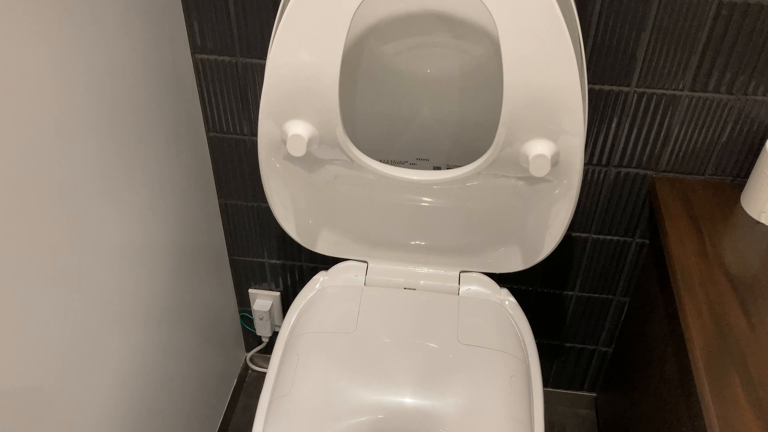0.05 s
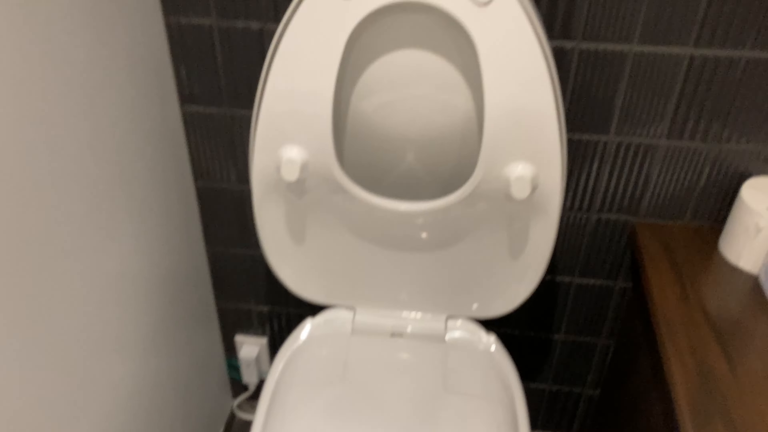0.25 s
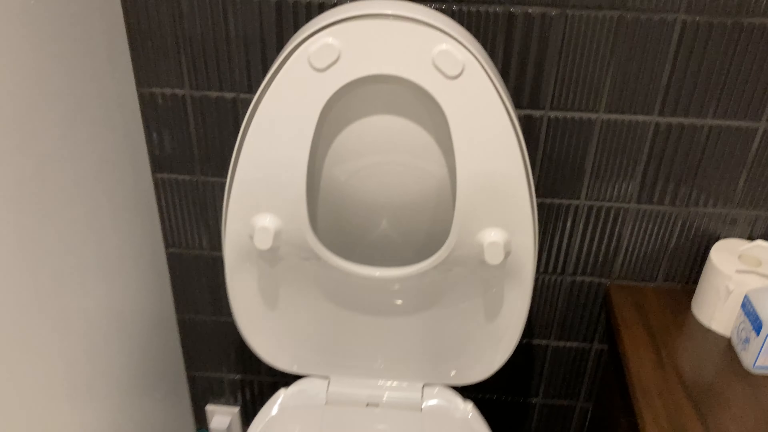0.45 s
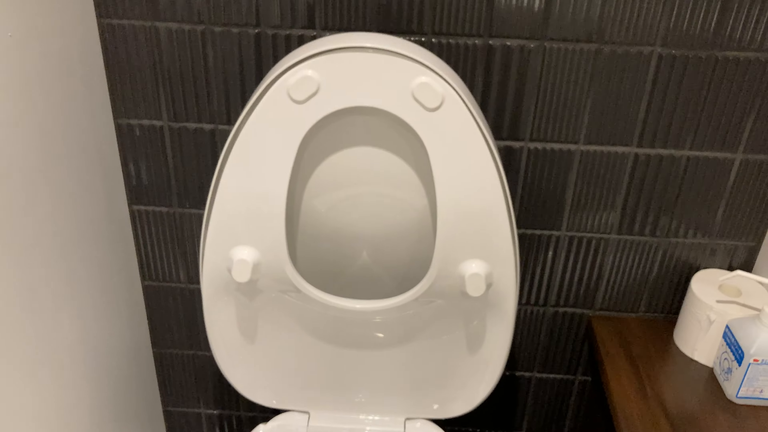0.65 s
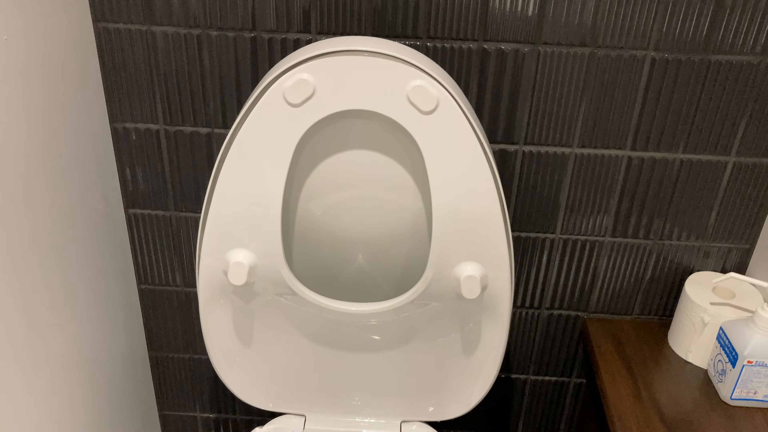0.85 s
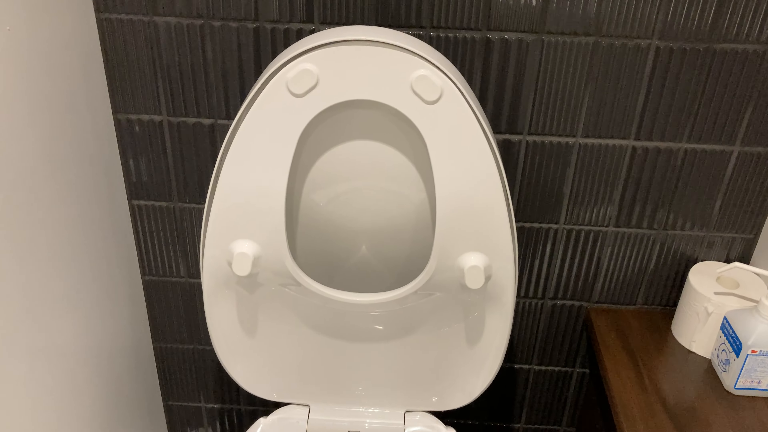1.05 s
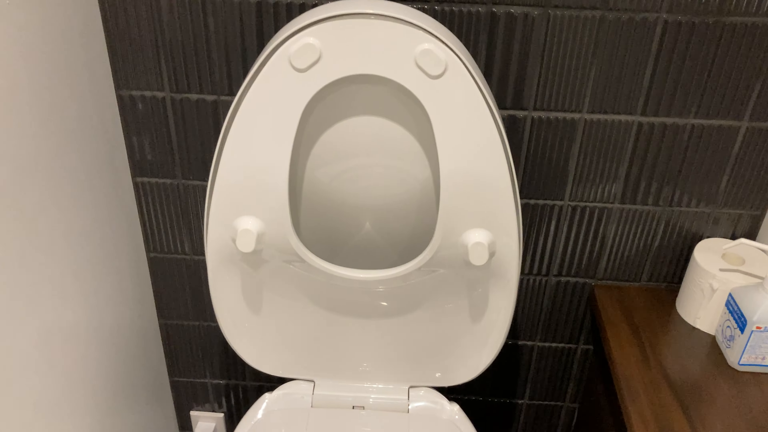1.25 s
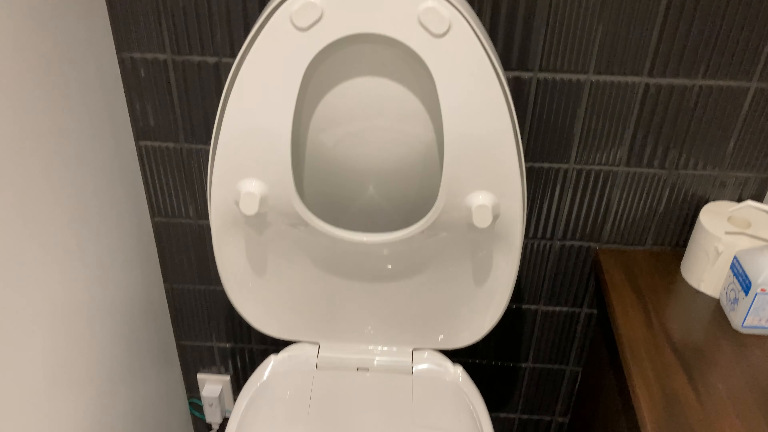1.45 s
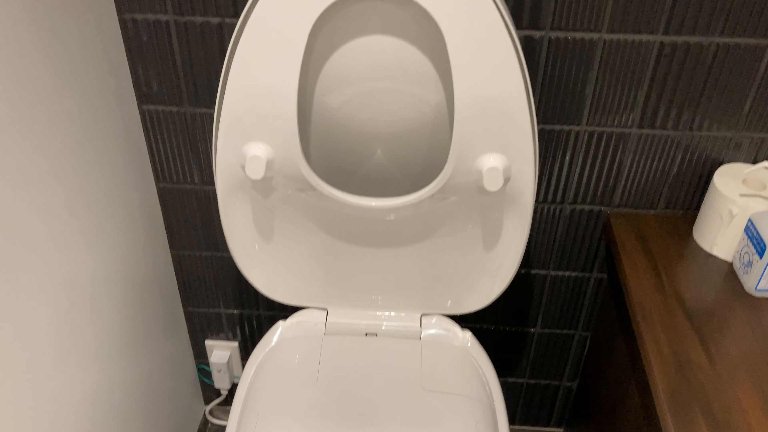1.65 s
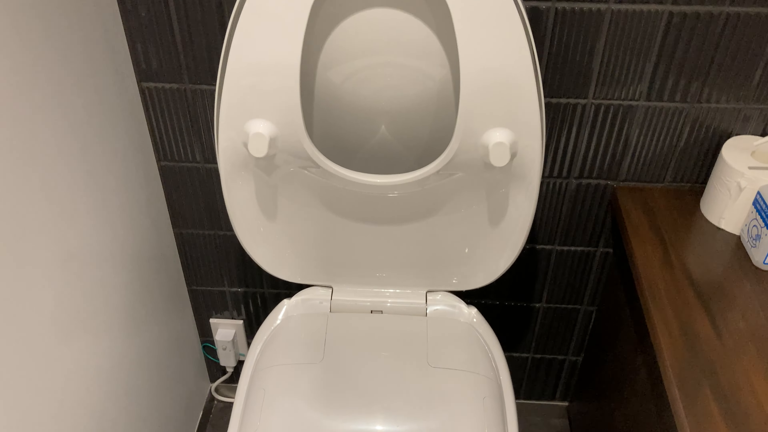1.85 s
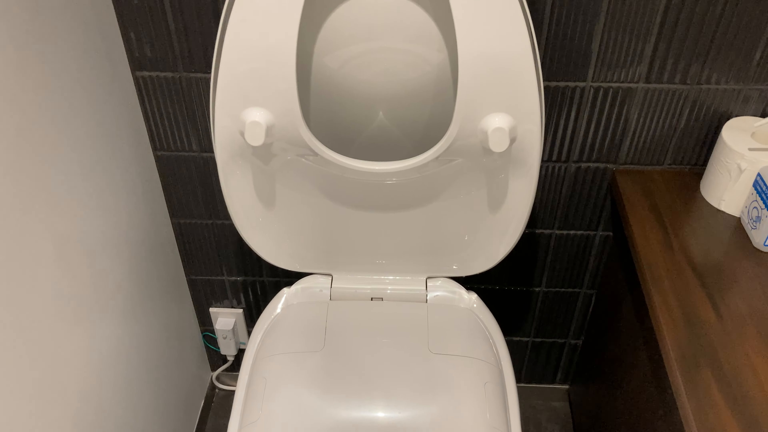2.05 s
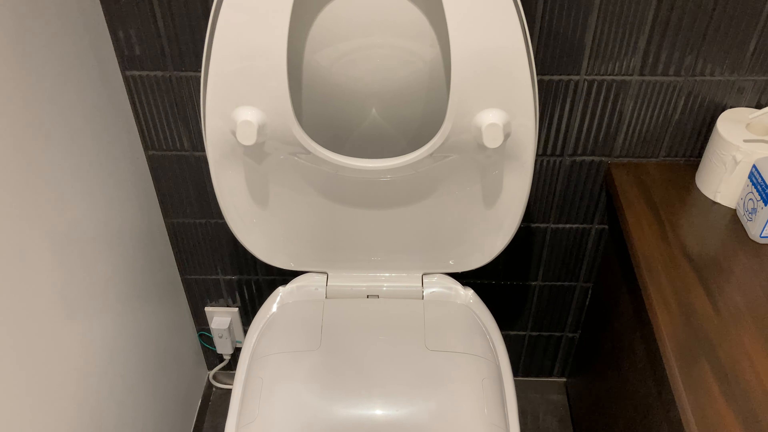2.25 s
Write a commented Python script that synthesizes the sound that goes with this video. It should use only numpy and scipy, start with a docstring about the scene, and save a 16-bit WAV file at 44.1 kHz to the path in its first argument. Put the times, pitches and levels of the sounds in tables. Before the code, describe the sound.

A plastic toilet seat knocks once against its lid at about 0.2 seconds, roughly a metre away. The hard clack and hollow thump ring in a small tiled restroom, dying away within half a second. Ventilation hums and hisses throughout, with soft swells of low rumble. Three faint, dull knocks come at about 1.2, 1.5 and 1.9 seconds, with a barely audible rustle near 1.8 seconds.

```python
"""A small tiled restroom: a raised plastic toilet seat knocks once against its lid, about a metre away.
Hard edges clack together, the seat rings and the lid flexes with a thump. The room answers with
a short bright tail, a low bloom and standing waves. Ventilation hums and hisses throughout;
soft swells of rumble, three faint knocks and a light rustle follow."""
import sys
import numpy as np
from scipy import signal
from scipy.fft import rfft, irfft, next_fast_len
from scipy.io import wavfile

SR = 44100
rng = np.random.default_rng(int(sys.argv[2]) if len(sys.argv) > 2 else 0)


def file_out(sig):
    """Save sig as 16-bit WAV at sys.argv[1]."""
    # one column per channel
    cols = np.atleast_2d(sig).T
    # limit, then scale
    lim = np.clip(cols, -1, 1)
    pcm = np.round(lim * 32767).astype(np.int16)
    wavfile.write(sys.argv[1], SR, pcm)


N = 101429

# stereo image of the room: f/Hz, left-right correlation, L-R/dB
STEREO_IMAGE = [(59, 0.96, 2), (255, 0.7, 4.2), (463, 0.59, -0.8), (920, -0.19, 3.5), (1890, -0.26, 2.5),
                (4400, 0.11, 1.5), (9000, -0.11, 0)]
ROOM_LOW_T60_S, ROOM_HIGH_T60_S, ROOM_SPLIT_HZ = 0.51, 0.33, 5100
RIPPLE_DB, RIPPLE_DELAY_S, RIPPLE_FROM_HZ = 2.05, .008, 550

# tone of the rushing air: f/Hz, relative level/dB
AIR_EQ = [(20, -52), (40, -7), (60, 1.5), (100, 1), (200, -9.5), (300, -11.5), (450, -16), (640, -21.5),
          (800, -31.5), (1030, -21.5), (1450, -25.5), (2000, -25), (2400, -30), (3100, -28), (4600, -36),
          (5600, -40), (7500, -42), (11500, -49.5), (13500, -60), (16000, -68)]
# fader ride on its hiss: t/s, level/dB
HISS_RIDE = [(0, -1), (.6, -1.5), (1.05, -2), (1.3, -0.5), (1.55, -1), (1.72, 3), (1.86, 3), (2.0, 0),
             (2.3, 0)]
AIR_DB, HISS_FROM_HZ = -41, 1430
# duct resonances: f/Hz, half width/Hz, rms level/dB
DUCT_MODES = [(53.2, 4.3, -49), (132.9, 3.9, -48.5), (176.75, 3, -47), (223.3, 6, -48.5), (268.5, 6, -58.5),
              (342.5, 8.6, -57), (417, 5.4, -57.5), (474.4, 25, -55.5), (564, 8.7, -59.5),
              (632, 4.8, -63.5), (682.5, 13, -64.5), (1045, 9.3, -69.5), (1390, 27, -63.5), (1505, 21, -64)]
# fader ride on the hum: t/s, relative level/dB
HUM_RIDE = [(0, -36), (.12, -32.5), (.19, -49), (.4, -29), (.47, -30), (.64, -32), (.73, -38.5), (.84, -36),
            (.93, -44.5), (1.0, -44), (1.14, -43), (1.25, -32), (1.33, -37.5), (1.41, -36), (1.68, -44),
            (1.85, -34.5), (2.05, -32.5), (2.27, -42)]
HUM_HZ, HUM_WANDER_HZ, HUM_DB = 76.8, 2, -2.5

# plastic contacts within the one knock: t/s, relative level/dB, tilt/(dB per octave)
CONTACT_HITS = [(0.234, -9, -2.5), (0.2365, -.5, -.5), (0.241, -4, .6), (0.254, -9, 1.6), (0.279, -17, 1.8),
                (0.331, -20, 2.6)]
HARDEST_HIT_S = CONTACT_HITS[1][0]
# tone of a contact: f/Hz, relative level/dB
CLACK_EQ = [(40, -31), (150, -10), (300, -6), (460, 4), (600, -5), (780, -9.5), (900, -8.5), (1150, -4.5),
            (1600, -8), (2400, -12), (3300, -14), (6000, -24.5), (10500, -24), (15500, -32)]
CLACK_DB, CLACK_DIRECT_DB, CLACK_T60_S = 17.5, -4.5, 0.034
# tone of the hardest contact's snap: f/Hz, level/dB
SNAP_EQ = [(800, -27), (2800, 6), (5500, -15), (15000, -13)]
SNAP_T60_S = 0.0094
# modes of the seat: f/Hz, relative level/dB, T60/s, L-R/dB
SEAT_MODES = [(1006, 4.5, 0.15, 12), (1170, 12.5, 0.051, 15), (1600, -8.5, 0.12, 3), (1785, -9, 0.14, 5),
              (1990, -6.5, 0.2, 3), (2330, -23, 0.19, 3), (2985, -6, 0.17, 7)]
SEAT_DB, SEAT_RISE_S = -37.5, 0.00057
# modes of the lid: f/Hz, relative level/dB, T60/s
LID_MODES = [(93, -11.5, 0.056), (265.7, 3.5, 0.05), (331, 4.5, 0.028), (403, -11, 0.085)]
THUMP_S, THUMP_RISE_S, THUMP_DB = .2414, .005, -1

# tone of the thump's reflections: f/Hz, relative level/dB
BLOOM_EQ = [(60, -37), (150, -15), (210, 2), (330, 4), (480, -11), (660, -8), (770, -5.5), (900, -25),
            (1500, -48)]
BLOOM_DB, BLOOM_LAG_S, BLOOM_RISE_S, BLOOM_T60_S = 21.5, 0.0055, 0.014, 0.48
# standing waves of the room: f/Hz, relative level/dB, T60/s, L-R/dB
WAVE_MODES = [(132.2, 4, 0.26, 4.5), (192.2, 3.5, 0.275, -3), (224, 5.5, 0.27, 6), (235.6, 5, 0.22, 6),
              (269.3, -2, 0.31, -6), (294.7, 4.5, 0.36, -0.5), (335.3, -3.5, 0.44, 1),
              (344, -1.5, 0.47, 6.5), (386.7, -1.5, 0.32, 0), (409.3, -7, 0.39, -10), (428, -4.5, 0.356, 6),
              (468.5, -5.5, 0.36, 0), (509, -14.5, 0.49, 18), (517, -11.5, 0.27, -8), (629, -18, 0.45, 3)]
WAVES_DB, WAVES_LAG_S, WAVES_RISE_S = -19, 0.0123, 0.041
BOOM_HZ, BOOM_DB, BOOM_LAG_S, BOOM_RISE_S, BOOM_T60_S = 69, -13, 0.0261, 0.0093, 0.24

# swells of rumble: t/s, half length/s, f/Hz, rms level at the crest/dB
RUMBLE_SWELLS = [(1.4, 0.058, 52, -36.5), (1.62, 0.1, 53, -35.5), (1.9, 0.067, 53, -44),
                 (0.691, 0.054, 223, -43.5), (2.28, 0.1, 175, -36.5)]
RUMBLE_WIDTH_HZ = 6.3
# faint later knocks: t/s, relative level/dB, tilt/(dB per octave)
KNOCK_HITS = [(1.164, -9, -2), (1.493, -11.5, 3), (1.866, -15, 4.5)]
# their dull tone: f/Hz, relative level/dB
KNOCK_EQ = [(60, -15), (150, -3), (400, 1.5), (700, -1.5), (1200, -9), (2000, -17), (5000, -41),
            (14000, -63)]
KNOCK_DB, KNOCK_SEND_DB, KNOCK_T60_S = 10, -13, 0.031
# tone of the rustle: f/Hz, relative level/dB
RUSTLE_EQ = [(500, -18), (2000, -4), (3200, -5), (4500, 1), (6000, -3), (8000, -16), (11500, 9),
             (15500, -23)]
RUSTLE_S, RUSTLE_HALF_LENGTH_S, RUSTLE_DB = 1.78, 0.15, -70
LOW_CUT_HZ, HIGH_CUT_HZ = 30, 15650

TIME = np.arange(N) / SR
FREQS = np.fft.rfftfreq(N, 1 / SR)
SIDES = np.array([[1], [-1]])  # left, right


def gain(db):
    """Decibels to gain."""
    return 10 ** (np.asarray(db) / 20)


def unit_rms(x):
    """Scale to rms 1."""
    return x / np.sqrt(np.mean(x ** 2))


def curve(table, hz=FREQS, column=1):
    """Read a table column along a log-frequency axis."""
    rows = np.array(table, float)
    return np.interp(np.log(np.maximum(hz, 1)), np.log(rows[:, 0]), rows[:, column])


def ride(table):
    """A fader move, in dB at every sample."""
    return np.interp(TIME, *np.array(table).T)


def equalise(x, db):
    """Minimum-phase EQ with the given dB in each bin."""
    cepstrum = irfft(np.log(gain(db)), N)
    cepstrum[1:N // 2] *= 2
    cepstrum[N // 2:] = 0
    return irfft(rfft(x) * np.exp(rfft(cepstrum)), N)


def diffuse_noise():
    """White noise from all around: narrow in the bass, wide in the treble."""
    size = next_fast_len(N, real=True)
    hz = np.fft.rfftfreq(size, 1 / SR)
    correlation = np.clip(curve(STEREO_IMAGE, hz), -1, 1)
    mid, side = rfft(rng.standard_normal((2, size)))
    pair = mid * np.sqrt((1 + correlation) / 2) + SIDES * side * np.sqrt((1 - correlation) / 2)
    balance = gain(SIDES * curve(STEREO_IMAGE, hz, column=2) / 2)
    return irfft(pair * balance, size)[:, :N]


def decay(start, t60):
    """Exponential decay from a start time."""
    age = TIME - start
    return (age >= 0) * np.exp(-np.log(1000) * np.maximum(age, 0) / t60)


def ring(start, hz, t60, rise):
    """One mode that builds up and dies away."""
    age = np.maximum(TIME - start, 0)
    return -np.sin(2 * np.pi * hz * age) * (1 - np.exp(-age / rise)) * decay(start, t60)


def burst(start, t60):
    """A decaying noise burst of unit energy."""
    return unit_rms(diffuse_noise() * decay(start, t60)) / np.sqrt(N)


def wall_ripple():
    """Early reflections off nearby walls make the treble uneven; dB in each bin."""
    echoes = rng.standard_normal(N) * (TIME < RIPPLE_DELAY_S)
    return RIPPLE_DB * unit_rms(rfft(echoes).real) * FREQS ** 2 / (FREQS ** 2 + RIPPLE_FROM_HZ ** 2)


def vent_air():
    """Air rushes through the vent, its hiss drifting in level."""
    tone = curve(AIR_EQ) + .5 * wall_ripple()
    air = gain(AIR_DB) * unit_rms(equalise(diffuse_noise(), tone))
    hiss = irfft(rfft(air) * FREQS ** 2 / (FREQS ** 2 + HISS_FROM_HZ ** 2), N)
    return air + hiss * (gain(ride(HISS_RIDE)) - 1)


def vent_duct():
    """The air flow keeps narrow resonances ringing."""
    flow = rfft(diffuse_noise())
    return sum(gain(db) * unit_rms(irfft(flow / (1 + ((FREQS - hz) / width) ** 2), N))
               for hz, width, db in DUCT_MODES)


def vent_hum():
    """The ventilation's low hum wavers in pitch and level."""
    wander = unit_rms(irfft(rfft(rng.standard_normal(N)) * np.exp(-(FREQS / 6) ** 2), N))
    pitch = HUM_HZ + HUM_WANDER_HZ * wander
    hum = unit_rms(np.sin(2 * np.pi * np.cumsum(pitch) / SR))
    return hum * gain(HUM_DB + ride(HUM_RIDE))


def clack():
    """Hard plastic edges meet in quick succession; the hardest contact opens with a snap."""
    octaves = np.log2(np.maximum(FREQS, CLACK_EQ[0][0]) / 1500)
    tone = curve(CLACK_EQ) + CLACK_DB + wall_ripple()
    mix = equalise(burst(HARDEST_HIT_S, SNAP_T60_S), curve(SNAP_EQ))
    for start, db, tilt in CONTACT_HITS:
        hit = gain(CLACK_DIRECT_DB) * burst(start, CLACK_T60_S) + tile_reverb(start)
        mix += equalise(hit, tone + db + tilt * octaves)
    return mix


def tile_reverb(start):
    """Dense reflections off the tiles, at unit energy; the treble dies first."""
    noise = diffuse_noise()
    low = signal.lfilter(*signal.butter(1, ROOM_SPLIT_HZ, fs=SR), noise)
    tail = low * decay(start, ROOM_LOW_T60_S) + (noise - low) * decay(start, ROOM_HIGH_T60_S)
    return unit_rms(tail) / np.sqrt(N)


def seat_ring():
    """The hardest contact rings the plastic seat."""
    return sum(gain(SEAT_DB + db + SIDES * pan / 2) * ring(HARDEST_HIT_S, hz, t60, SEAT_RISE_S)
               for hz, db, t60, pan in SEAT_MODES)


def lid_thump():
    """The lid flexes for a few cycles and gives the hit its body."""
    return sum(gain(THUMP_DB + db) * ring(THUMP_S, hz, t60, THUMP_RISE_S) for hz, db, t60 in LID_MODES)


def bloom():
    """The thump comes back from the walls as a dense low tail."""
    start = THUMP_S + BLOOM_LAG_S
    attack = 1 - np.exp(-np.maximum(TIME - start, 0) / BLOOM_RISE_S)
    return equalise(burst(start, BLOOM_T60_S) * attack, curve(BLOOM_EQ) + BLOOM_DB)


def standing_waves():
    """The thump sets the air between the walls ringing; the lowest mode booms in late."""
    start = THUMP_S + WAVES_LAG_S
    waves = sum(gain(WAVES_DB + db + SIDES * pan / 2) * ring(start, hz, t60, WAVES_RISE_S)
                for hz, db, t60, pan in WAVE_MODES)
    boom = gain(BOOM_DB) * ring(THUMP_S + BOOM_LAG_S, BOOM_HZ, BOOM_T60_S, BOOM_RISE_S)
    return waves + boom


def rumble():
    """Narrow bands of low noise softly swell and sink."""
    spectrum = rfft(diffuse_noise())
    mix = np.zeros((2, N))
    for crest, half_length, hz, db in RUMBLE_SWELLS:
        band = unit_rms(irfft(spectrum * np.exp(-((FREQS - hz) / RUMBLE_WIDTH_HZ) ** 2), N))
        mix += gain(db) * band * np.exp(-((TIME - crest) / half_length) ** 2)
    return mix


def faint_knocks():
    """Dull knocks with a touch of the same tiled room."""
    octaves = np.log2(np.maximum(FREQS, KNOCK_EQ[0][0]) / 1000)
    mix = np.zeros((2, N))
    for start, db, tilt in KNOCK_HITS:
        hit = burst(start, KNOCK_T60_S) + gain(KNOCK_SEND_DB) * tile_reverb(start)
        mix += equalise(hit, curve(KNOCK_EQ) + KNOCK_DB + db + tilt * octaves)
    return mix


def rustle():
    """A soft bright rustle, as of someone shifting."""
    swell = np.exp(-((TIME - RUSTLE_S) / RUSTLE_HALF_LENGTH_S) ** 2)
    return gain(RUSTLE_DB) * unit_rms(equalise(diffuse_noise(), curve(RUSTLE_EQ))) * swell


def scene():
    """The seat hit and its room over a bed of ventilation, then small background sounds."""
    bed = vent_air() + vent_duct() + vent_hum()
    hit = clack() + seat_ring() + lid_thump() + bloom() + standing_waves()
    return bed + hit + rumble() + faint_knocks() + rustle()


def record(dry):
    """Master EQ: thin the deepest bass and cut the top steeply."""
    thinned = irfft(rfft(dry) * (1 - np.exp(-(FREQS / LOW_CUT_HZ) ** 2)), N)
    high_cut = signal.ellip(12, .2, 80, HIGH_CUT_HZ, fs=SR, output="sos")
    return signal.sosfilt(high_cut, thinned)


dry = scene()
out = record(dry)
file_out(out)
```